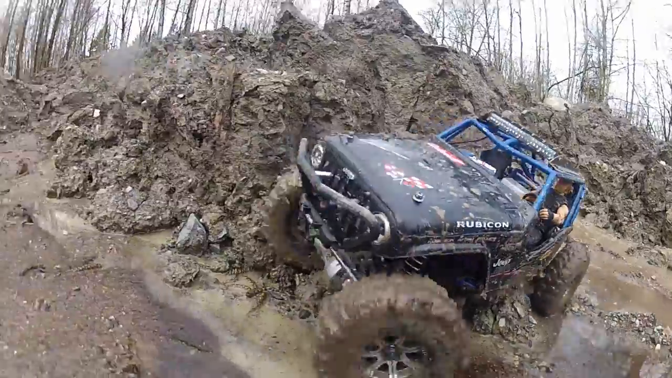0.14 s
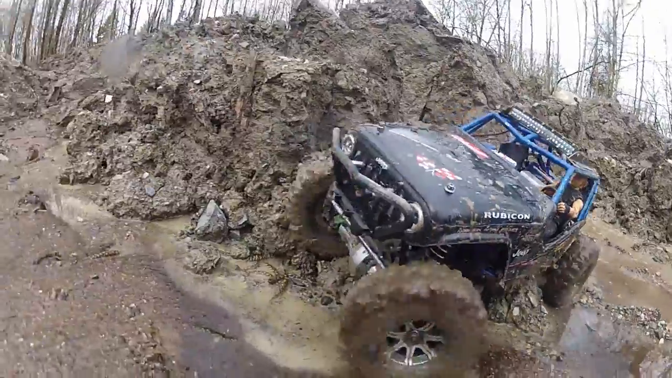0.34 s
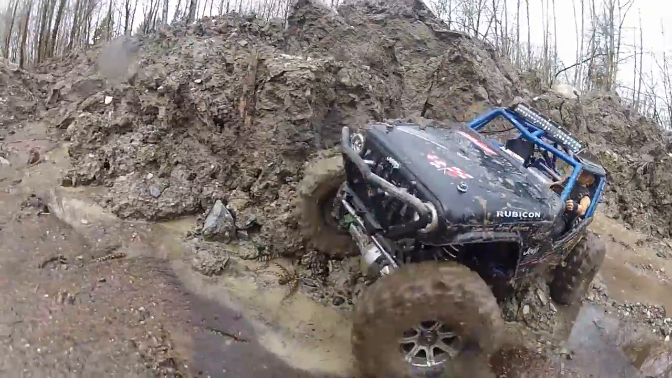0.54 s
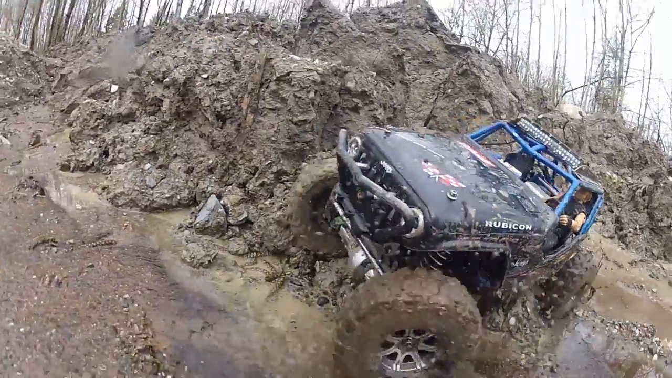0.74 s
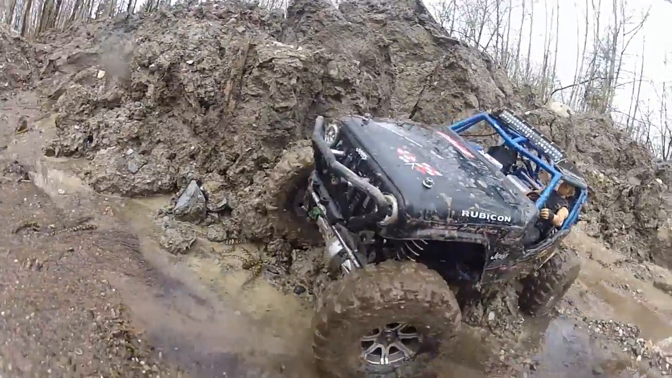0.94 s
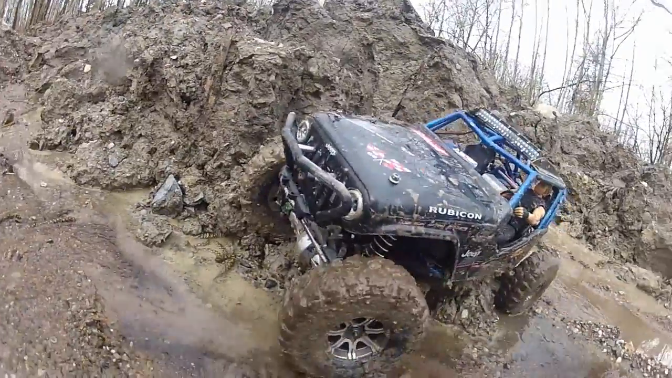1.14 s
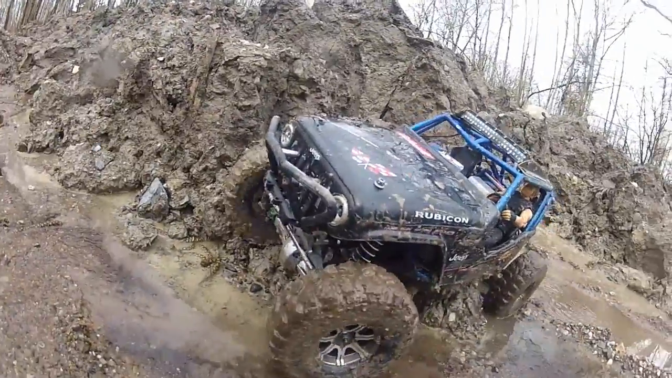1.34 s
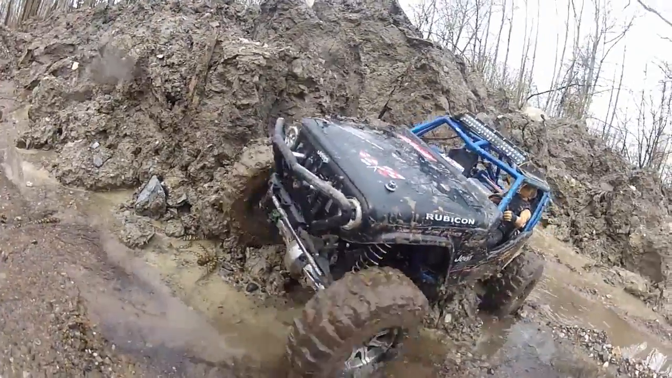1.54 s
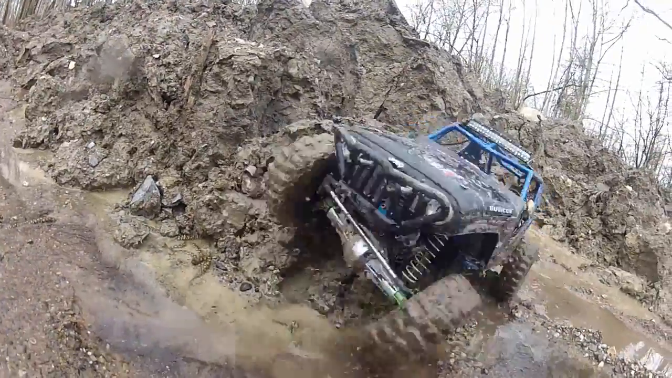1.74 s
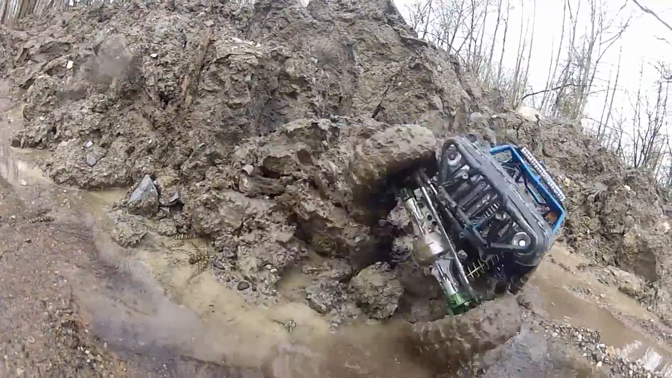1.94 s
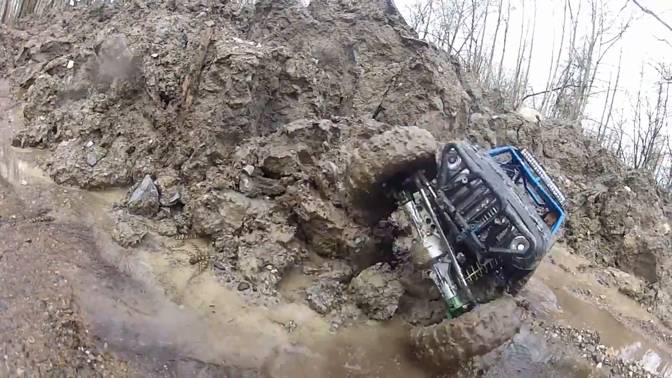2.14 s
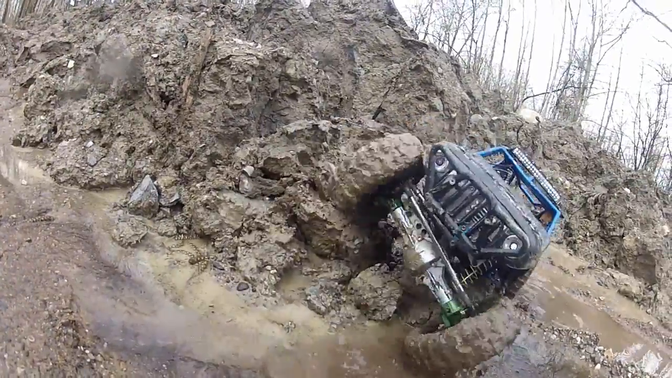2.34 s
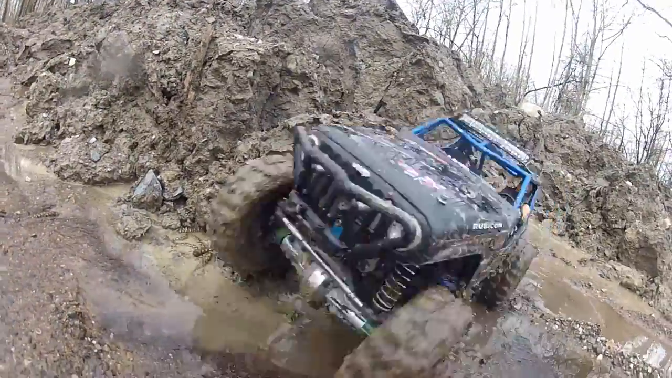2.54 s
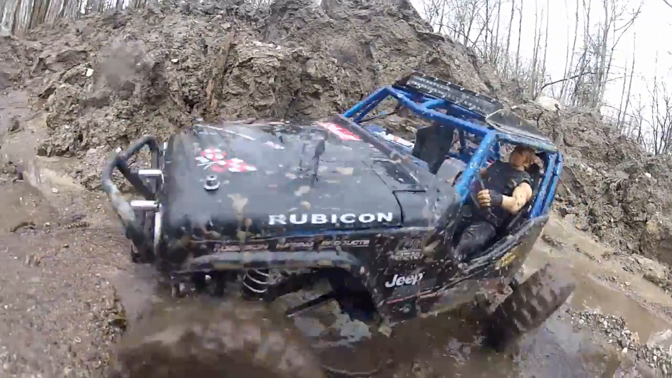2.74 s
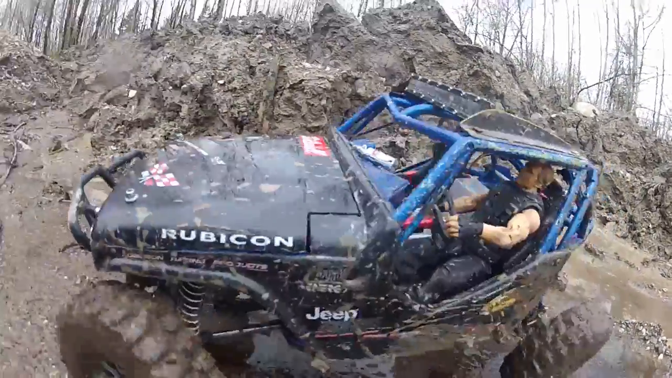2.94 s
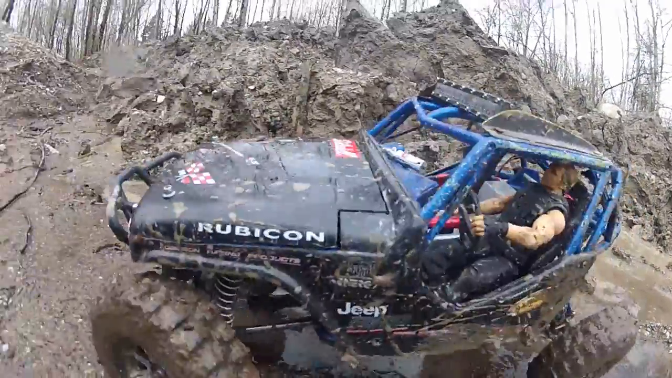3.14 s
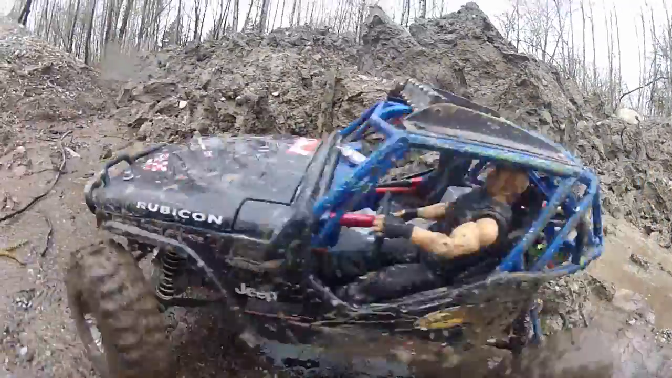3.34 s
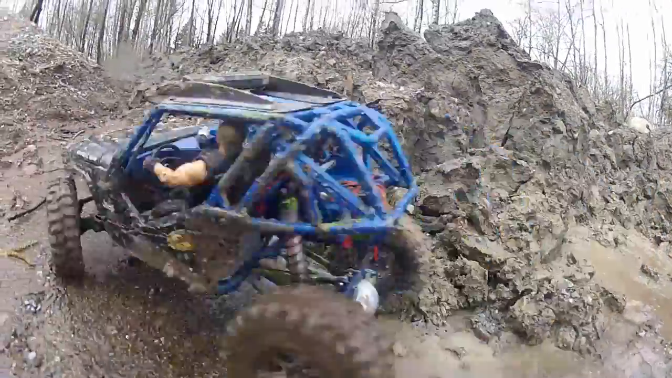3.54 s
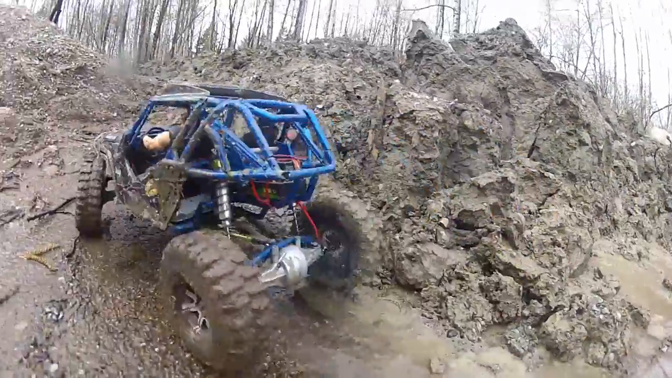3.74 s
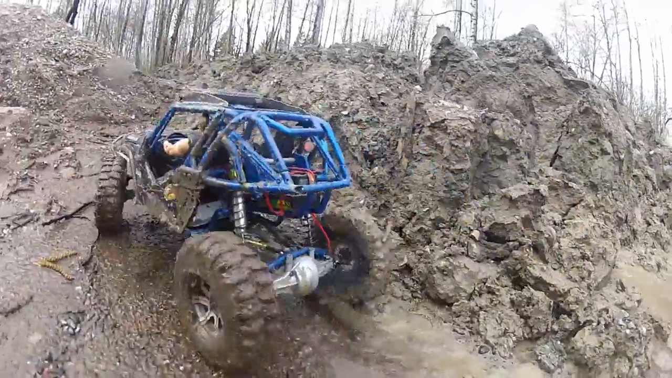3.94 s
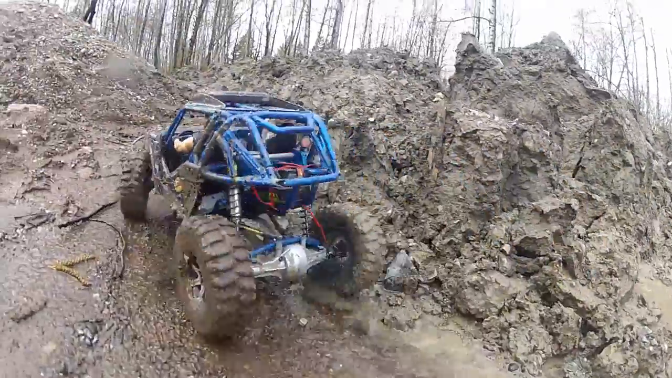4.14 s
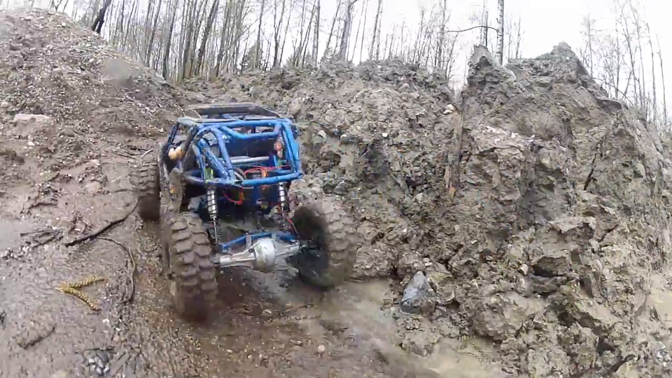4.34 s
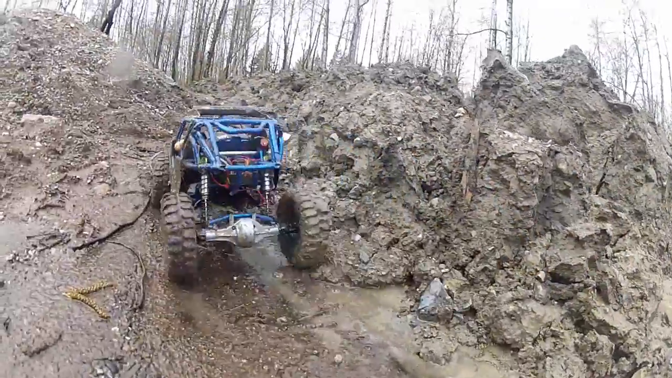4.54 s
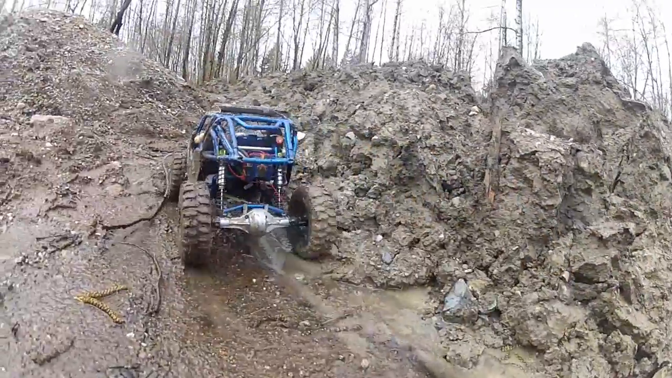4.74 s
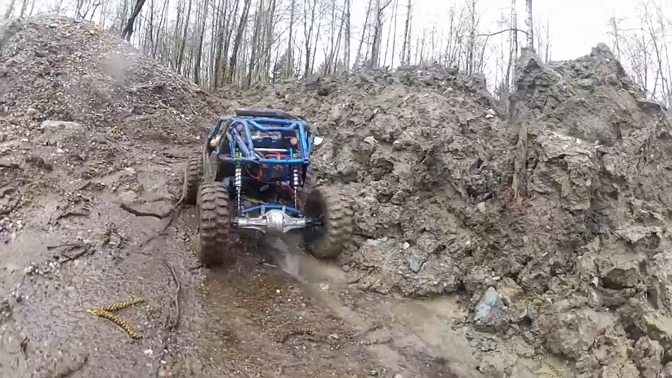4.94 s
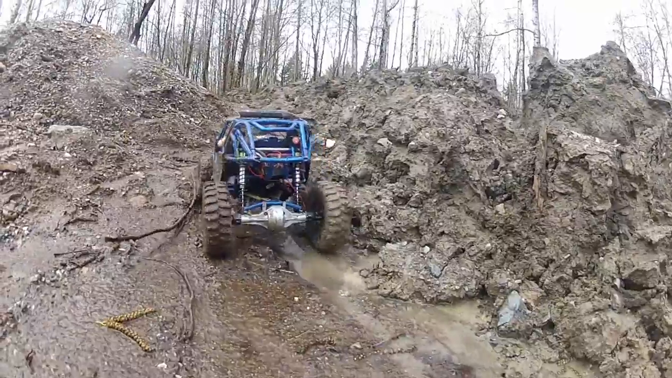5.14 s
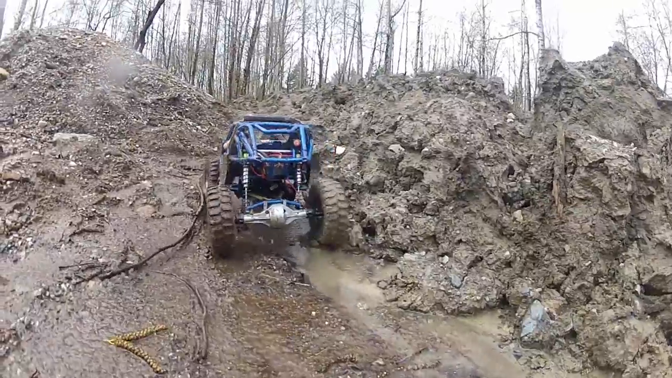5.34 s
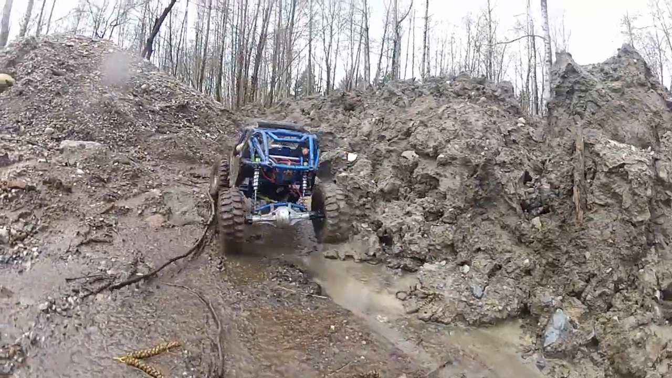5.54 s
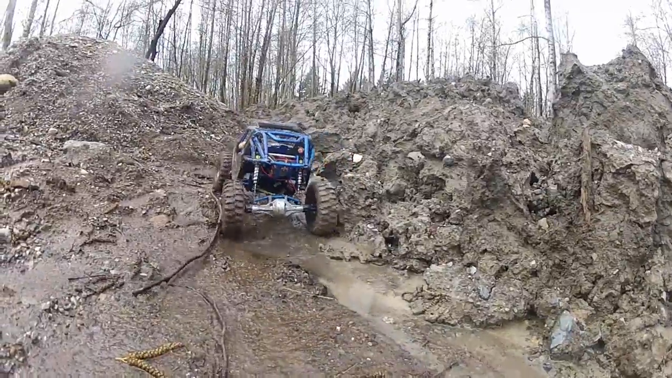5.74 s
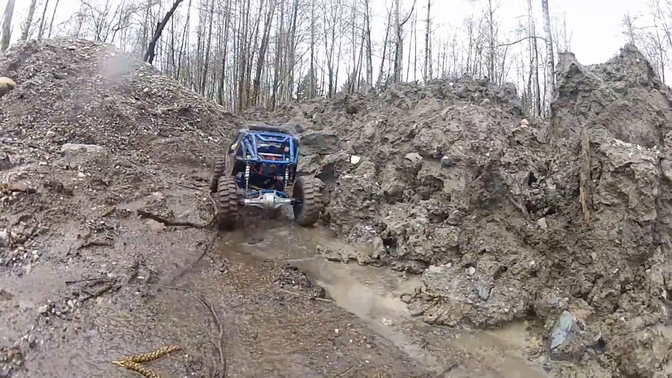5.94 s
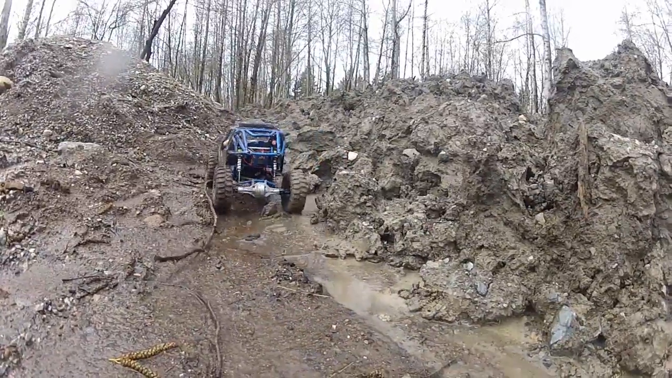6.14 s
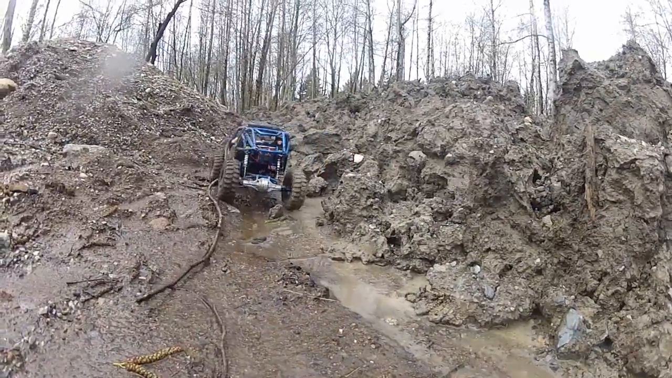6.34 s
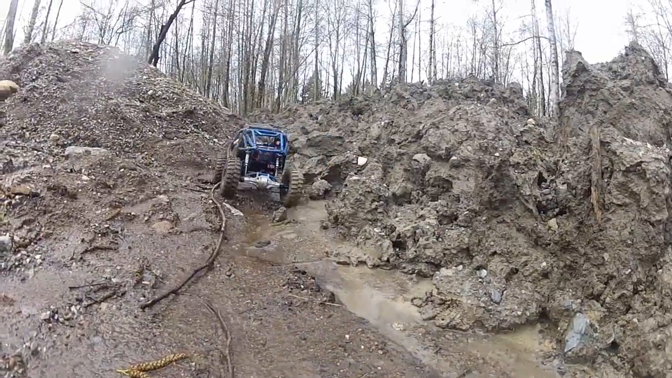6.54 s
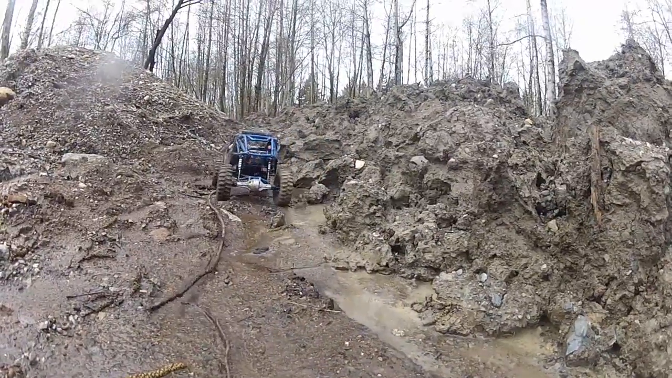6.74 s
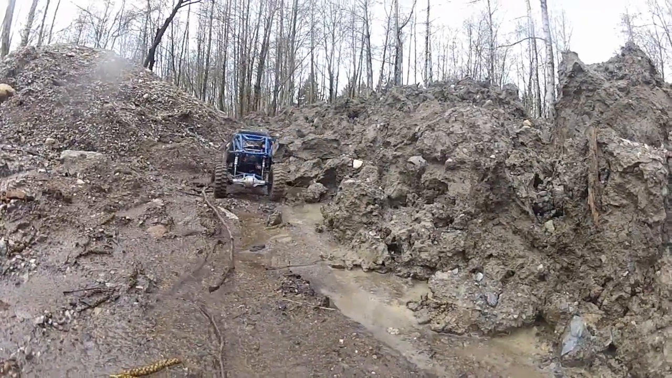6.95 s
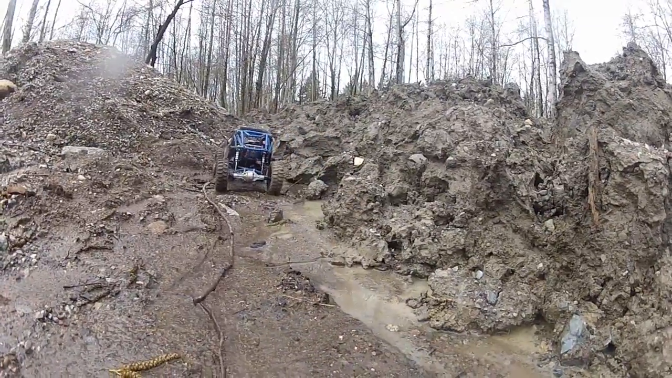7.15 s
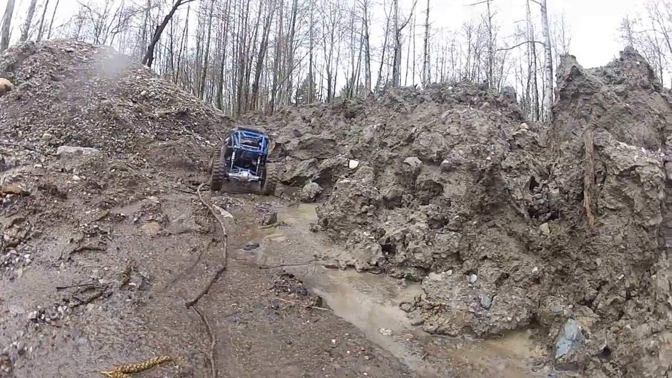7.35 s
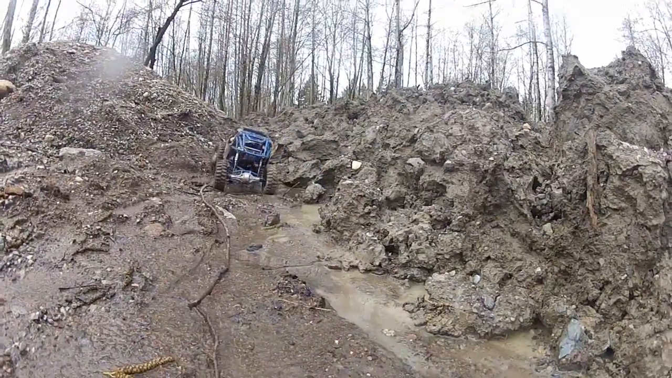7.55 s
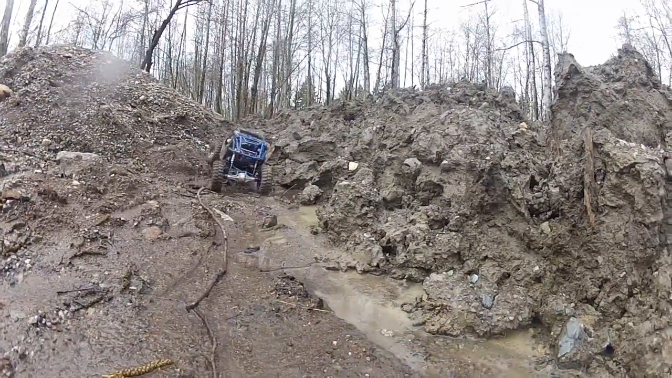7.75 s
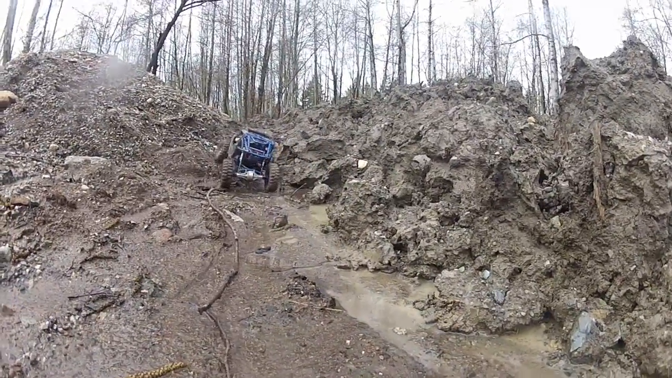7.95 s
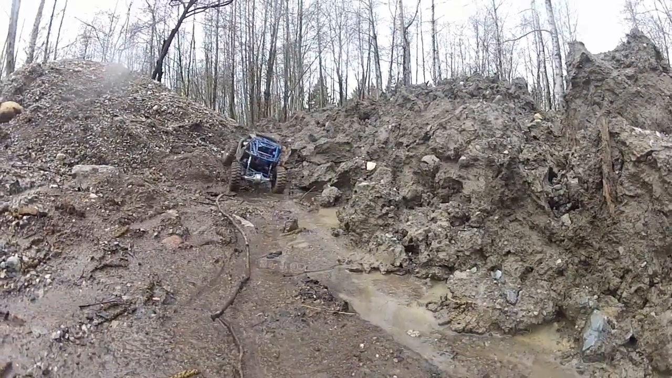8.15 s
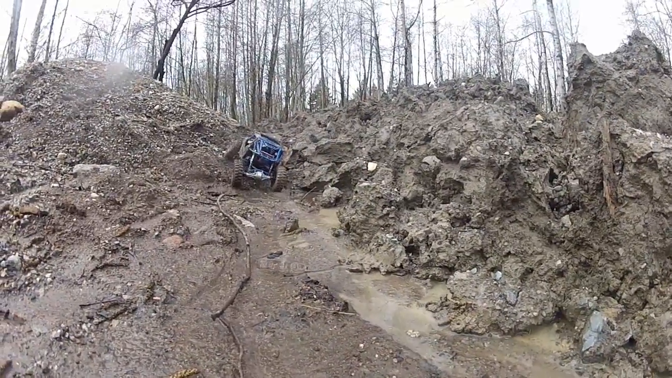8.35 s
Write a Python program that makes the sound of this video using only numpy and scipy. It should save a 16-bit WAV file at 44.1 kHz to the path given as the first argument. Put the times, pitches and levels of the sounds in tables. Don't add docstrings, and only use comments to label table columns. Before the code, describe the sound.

Small electric model truck rattles and whines through mud beside the microphone, knocks hard once, falls quiet, surges twice, then grinds away under wind rumble.

```python
import sys
import numpy as np
from scipy import signal
from scipy.fft import rfft, irfft
from scipy.io import wavfile
from scipy.ndimage import uniform_filter1d

SR = 44100
rng = np.random.default_rng(int(sys.argv[2]) if len(sys.argv) > 2 else 0)


def unload_wav(signal):
    wavfile.write(
        sys.argv[1],
        SR,
        np.round(np.clip(np.atleast_2d(signal).T, -1, 1) * 32767).astype(np.int16),
    )


def natural_amplitude(level_db):
    exponent = np.asarray(level_db, float) / 20
    return 10 ** exponent


N = 373968
TIME = np.arange(N) / SR

# start [s], crest [s], end [s], crest level [dB], end level [dB].
BURSTS = [(0.0, 0.033, 0.65, -57, -54), (0.55, 0.56, 0.58, -43, -39.5), (0.595, 0.734, 0.89, -42.5, -44.5),
          (1.325, 1.683, 1.97, -58, -59.5), (2.395, 2.712, 2.93, -46.5, -55),
          (2.927, 2.934, 3.08, -61, -64.5), (3.13, 3.206, 3.36, -73, -68), (3.27, 3.473, 3.68, -49, -50),
          (3.65, 3.704, 3.94, -57, -57.5), (3.94, 4.073, 4.665, -53.5, -56),
          (4.68, 4.86, 5.55, -58.5, -56.5), (5.5, 5.58, 6.2, -57.5, -57.5), (6.15, 6.2, 6.9, -59, -57),
          (6.896, 6.947, 9.35, -58, -62)]
# time [s], share [0-1].
TURN = [(0.0, 0.47), (.55, 0.35), (.68, 0.29), (2.9, 0.01), (3.05, 0.55), (3.3, 0), (3.66, 0), (3.9, 0.78),
        (4.75, 1.02), (5.5, 1.19), (8.48, 0.94)]
# frequency [Hz], width [Hz], level [dB].
CHASSIS_MODES = [(1127, 78, -6.5), (1316, 87, -1.5), (1500, 47, -0.5), (1690, 63, -2.5), (1921, 110, 1)]
GEARBOX_MODES = [(2247, 147, -7), (2405, 400, -12.5)]
CAN_MODES = [(2898, 128, 5.5), (3286, 100, -14), (3665, 280, -0.5)]
SHELL_MODES = [(591, 190, 2.5), (790, 145, 0)]
# time [s], mesh frequency [Hz], load [dB].
SURGES = [
    [(.465, 1044, -3), (.485, 1168, 3), (.505, 1100., -3), (.525, 1130., -8), (.556, 1470., 1),
     (.6, 1455, -2.5), (.636, 1690., 8)],
    [(2.42, 1376, -2), (2.45, 1400., 0.5), (2.475, 1047, -6), (2.53, 1339, -1), (2.57, 1160., -3),
     (2.6, 1489, 1), (2.62, 1642, -2), (2.642, 1470, 5), (2.662, 1472, -1)],
    [(2.666, 2285, 1), (2.688, 2336, 1), (2.7, 1950., -6), (2.714, 1937, 7), (2.73, 2244, -8),
     (2.742, 2250., 0), (2.752, 1900., 1), (2.768, 1750., -1), (2.8, 1855, -8)],
    [(2.802, 1484, 2), (2.811, 1358, 9.5), (2.825, 1160., 6.5), (2.84, 1224, -4), (2.852, 1330., 6.5),
     (2.866, 1497, -3), (2.878, 1452, -4), (2.892, 1180., -2), (2.93, 1048, -12)],
    [(3.39, 990., -10), (3.415, 1230., -3), (3.44, 1560., -4), (3.455, 1550., -5), (3.468, 1486, 2),
     (3.49, 1330., -3), (3.505, 1603, 1), (3.52, 2202, 1)],
    [(3.52, 2197, 5), (3.536, 1860., 5.5), (3.556, 1850., -5), (3.57, 2317, 1), (3.587, 2200., -3),
     (3.598, 1900., 6), (3.624, 1900., -3.5), (3.635, 1878, 5), (3.652, 1873, 1)],
    [(3.652, 1790, -3), (3.67, 1398, -4), (3.7, 1053, -1)],
    [(3.738, 1102, 0), (3.755, 1280., 3.5), (3.787, 1080., 1.5)],
]
# time [s], mesh frequency [Hz], load [dB].
CRAWL_NEAR = [
    [(0.0, 855, 6), (.055, 874, 2), (.1, 638, 4), (.16, 667, 3), (.2, 779, 1.5), (.29, 738, -1),
     (.335, 860, -6), (.41, 764, -2), (.45, 800., 5)],
    [(3.8, 744, 10.5), (3.9, 742, -11), (3.97, 680., 5.5), (4.04, 730., 0), (4.13, 703, -3), (4.15, 747, 7),
     (4.23, 740., -3)],
    [(4.23, 749, -1), (4.27, 901, 0), (4.31, 1006, 4.5), (4.38, 740., -1), (4.45, 943, 6.5),
     (4.49, 818, 2.5), (4.555, 1004, 1), (4.62, 875, 2.5), (4.68, 750., -6)],
    [(4.83, 536, 6), (4.892, 669, 4), (4.99, 640., -8), (5.14, 505, 3), (5.2, 570., 10), (5.27, 563, 2),
     (5.33, 509, 7), (5.37, 562, -2), (5.434, 564, -4)],
]
# time [s], mesh frequency [Hz], load [dB].
CRAWL_FAR = [
    [(5.434, 564, 0), (5.5, 648, -8), (5.54, 639, 7), (5.58, 790., 1), (5.674, 786, 4.5), (5.732, 965, 1.5),
     (5.8, 654., -1)],
    [(5.8, 653, 2), (5.888, 835., 2), (5.946, 775, -1.5), (6.028, 1005, 1.5), (6.078, 780., -13),
     (6.11, 739, -5), (6.17, 988, 2), (6.256, 743.8, -8)],
    [(6.256, 740., 1), (6.3, 790., -3), (6.37, 651, 5), (6.47, 768, 1.5), (6.53, 650, 6),
     (6.62, 800., -1.5), (6.68, 649, 3), (6.77, 749, 0), (6.83, 656, 7)],
    [(6.9, 660, 10), (7.15, 647, 5), (7.28, 640, -13), (7.37, 751, 0), (7.54, 762, -6), (7.6, 600, 8),
     (7.66, 748, -2), (7.75, 770, -4)],
    [(7.75, 771, 2), (7.85, 637, 5), (7.92, 570., 3), (8.0, 650, 8.5), (8.06, 750., 4), (8.16, 742, 3),
     (8.25, 650, 9), (8.33, 580., 7), (8.48, 670, 5.5)],
]
CRAWLS = CRAWL_NEAR + CRAWL_FAR
# level [dB] of one surge, then of one crawl.
WHINE_DB = [-47, -44.5, -41, -43, -41, -41, -44.5, -46.5, -45.5, -49.5, -48.5, -56, -51, -51, -52.5, -56.5,
            -61.5]
# frequency [Hz], width [Hz], level [dB].
SINGING_MODES = [(800, 89, -3), (1002, 50, 4.5), (1130, 120, -0.5), (1308, 83, 1.5), (1496, 66, 2.5),
                 (1770, 194, 3.5), (1924, 155, 4), (2337, 88, 1), (2920, 320, 3), (3720, 340, 1)]
# frequency [Hz], density [dB per Hz].
AIR_SPECTRUM = [(12, -44), (20, -5), (60, -1.5), (114, -10.5), (148, -11), (331, -10.5), (356, -12),
                (546, -19), (1060, -23.5), (2020, -24.5), (2890, -27), (5490, -29.5), (5900, -25.5),
                (7670, -64), (13000, -120)]
# time [s], level [dB].
GUSTS = [(0.0, -55), (0.28, -55.5), (0.71, -54), (0.9, -63), (2.1, -67.5), (2.5, -70), (2.9, -61),
         (3.3, -61), (4.94, -67.5), (5.6, -63.5), (6.1, -65), (6.75, -58.5), (6.9, -61), (7.2, -70.5),
         (7.93, -61), (8.2, -66), (8.48, -70)]
# time [s], peak level [dB], frequency [Hz].
THUMPS = [(0.092, -38, 82), (.12, -42, 60.5), (0.15, -39, 63), (0.211, -36, 97), (0.27, -40.5, 108),
          (.33, -50, 69.8), (.39, -55.5, 70), (0.5, -34.5, 109), (0.598, -34, 67.1), (0.656, -38, 168),
          (0.71, -34.5, 118), (0.821, -37.5, 79), (2.615, -42.5, 124), (2.714, -42, 122),
          (2.891, -40.5, 119), (3.03, -48, 70), (3.173, -42.5, 86), (3.716, -46, 115), (4.07, -48, 88.64),
          (5.465, -47, 49.98), (5.83, -44.5, 78.2), (6.23, -45, 55.24), (6.256, -39, 240), (6.263, -42, 60),
          (6.317, -38.5, 71.5), (6.395, -47, 69.93), (6.41, -49, 39.9), (6.524, -46, 111.8),
          (6.545, -40, 95), (6.565, -49, 50.4), (6.602, -47, 121), (6.669, -45, 99.2), (6.699, -42, 103.7),
          (6.753, -40.5, 83.5), (6.775, -48, 49.7), (6.808, -32, 97), (6.875, -40, 40.17), (6.907, -41, 72),
          (6.925, -49, 39.95), (7.368, -44, 117.5), (7.755, -40, 84.1), (8.035, -38, 119.3)]
# time [s], crack peak [dB], boom relative to it [dB], boom frequency [Hz],
# wall ring relative to it [dB].
KNOCKS = [
    (.5712, -8.5, -3, 173, -14),
    (6.8527, -20, -8, 241, 6),
    (6.7695, -45.5, -15, 241, 6.5),
    (6.8215, -41, -15, 241, 6.5),
]
# frequency [Hz], level [dB], 60 dB decay time [s].
LID_MODES = [(1300, -6.5, 0.018), (1627, 5.5, 0.01), (2820, 4.5, 0.0068), (3560, 5, 0.0076),
             (5400, -6, 0.0092)]
# time [s], peak level [dB].
SLAMS = [(0.6404, -29), (0.6629, -31), (0.6848, -32), (0.7118, -32), (0.7507, -38), (0.7851, -31),
         (0.82, -36), (0.854, -47), (0.8709, -28), (2.4039, -58), (2.4608, -42), (2.4882, -48),
         (2.5012, -41), (2.5257, -42), (2.5351, -41), (2.5544, -41), (2.5716, -36.5), (2.6595, -23.5),
         (2.6874, -26), (2.7212, -28), (2.7402, -26.5), (2.7751, -38), (2.8978, -56), (3.5678, -29),
         (3.5788, -28.5), (2.671, -23), (3.48, -40)]
# time [s],
# peak level [dB], frequency [Hz].
CAN_RINGS = [(.6273, -41, 2880), (.6757, -40, 2940), (.6971, -37, 3020), (.73, -39, 2800), (.7367, -34, 3700),
             (.748, -35, 3650), (.7689, -31.5, 3660), (.779, -33, 3620), (.786, -35, 2950), (.798, -30, 3030),
             (.8138, -31, 3680), (.8145, -37, 2800), (.824, -33, 3600), (.8353, -29, 3610), (.846, -37, 3480),
             (2.581, -46, 3750), (2.617, -46, 3300), (2.712, -41, 3900), (2.762, -47, 3520), (2.9, -44, 3050),
             (3.3043, -47, 3040), (3.3582, -45, 2930), (3.3871, -48, 2935), (3.4141, -39.5, 3700),
             (3.437, -41, 2940), (3.5049, -41, 3740), (3.5318, -36.5, 3740), (3.55, -37, 3697),
             (3.5962, -32.5, 3735), (3.607, -38, 3734), (3.6326, -34, 3784), (3.6431, -35, 3720),
             (3.66, -46, 3050), (3.7478, -42.5, 3800), (3.787, -45.5, 3710)]
# first tick [s], last tick [s], gap [s], peak level [dB].
COGGING_RUNS = [(.9565, .9566, .03, -50), (1.0465, 1.2356, .063, -56), (1.0779, 1.2051, .0636, -64),
                (1.3039, 1.3269, .023, -62), (1.3838, 1.508, .0414, -54.5), (1.5244, 1.6147, .0226, -51),
                (2.339, 2.371, .032, -59.5), (3.1378, 3.1692, .0314, -52.5), (3.2176, 3.2525, .035, -52.5)]
# time [s], peak level [dB].
PICKUP = [(1.3353, -62), (1.3498, -61), (1.3713, -64), (1.4665, -53), (1.6282, -45), (1.6676, -42),
          (1.6916, -46), (1.7104, -43), (1.7365, -46), (1.7579, -43.5), (1.7898, -47), (1.8123, -45),
          (1.8392, -47), (1.8607, -44), (1.8794, -49), (1.8971, -46), (1.9144, -60), (1.9355, -44.5),
          (1.9514, -51), (1.9659, -48), (1.9844, -50), (2.0033, -53), (2.0522, -63)]
# first tick [s], last tick [s], mean gap [s], peak level [dB],
# bend [exponent; under 1 quickens].
SERVO_RUNS = [(1.2791, 1.5764, .037, -61, 0.65), (2.7822, 2.7823, .03, -41, 0.99),
              (2.9697, 3.1129, 0.036, -56.5, 0.81), (3.201, 3.283, .041, -54.5, 0.76),
              (3.8896, 3.9425, .0265, -55, 1.01), (4.7083, 4.818, .055, -59.5, 1.54)]
# start [s], length [s], peak level [dB], bright part relative to dull [dB].
SPATTER = [(6.763, 0.028, -50.5, -11), (6.82, 0.031, -51, -5), (6.844, 0.053, -35.5, -2),
           (7.992, 0.11, -60.5, -2.5), (8.093, 0.11, -61.5, -1)]
# frequency [Hz], gain [dB].
WEAK_BANDS = [(4300, 0.5), (4550, -5), (4750, -1), (5850, 1.5), (6050, -6), (6250, 1.5), (7300, -1),
              (7520, -5), (7750, 0.5), (10900, 0), (11300, 0.5), (12900, -5.5), (13300, 0.5), (14550, -3),
              (14750, -76)]


def curve(tables, column, off=-120.):
    out = np.full(N, off)
    for table in tables:
        rows = np.array(table)
        inside = (TIME >= rows[0, 0]) & (TIME <= rows[-1, 0])
        out[inside] = np.interp(TIME[inside], rows[:, 0], rows[:, column])
    return out


def unit(x):
    return x / np.sqrt(np.mean(x ** 2))


def band(x, lo_hz, hi_hz):
    return signal.sosfilt(signal.butter(3, [lo_hz, hi_hz], "band", fs=SR, output="sos"), x)


def ring(x, hz, width_hz):
    return signal.lfilter(*signal.iirpeak(hz, hz / width_hz, fs=SR), x)


def walk(rate):
    k = int(SR / rate)
    steps = np.repeat(rng.standard_normal(N // k + 1), k)
    return 1.356 * uniform_filter1d(uniform_filter1d(steps, k), k)[:N]


def grains(rate, spread_db):
    hit = rng.random(N) < rate / SR
    sign = rng.choice([-1, 1], N)
    size_db = spread_db * np.minimum(rng.exponential(size=N), 3.5)
    return unit(hit * sign * natural_amplitude(size_db))


def waver(x, depth_s, rate):
    return np.interp(TIME + depth_s * walk(rate), TIME, x)


def place(events, shape):
    out, span = np.zeros(N), np.arange(-5000, 5000)
    for s, db, *rest in events:
        where = int(s * SR) + span
        where = where[(where >= 0) & (where < N)]
        wave = shape(where / SR - s, *rest)
        out[where] += natural_amplitude(db) * wave / np.abs(wave).max()
    return out


def struck(t, hz, t60, rise=0.00072):
    t = np.maximum(t, 0)
    return np.sin(2 * np.pi * hz * t) * (1 - np.exp(-t / rise)) * np.exp(-np.log(1000) * t / t60)


def throttle():
    rise_db_per_s, grab_s, release_s, rest_db = 42, 0.012, 0.096, -90
    levels = []
    for start, crest, end, crest_db, end_db in BURSTS:
        times = [start - grab_s, start, crest, end, end + release_s]
        start_db = crest_db - rise_db_per_s * (crest - start)
        levels.append(np.interp(TIME, times, [rest_db, start_db, crest_db, end_db, rest_db]))
    return np.max(levels, axis=0)


def body(modes, rate, spread_db, flicker_db, swell_db):
    shared, out = grains(rate, spread_db), 0
    for hz, width, db in modes:
        impacts = .5 * shared + grains(rate, spread_db)
        tone = ring(ring(impacts, hz, width), hz, 3 * width)
        level_db = db + flicker_db * walk(45) + swell_db * walk(7)
        out = out + natural_amplitude(level_db) * unit(waver(tone, 1.6 / hz, 14))
    return unit(out)


def drive_train():
    level_db, turn = uniform_filter1d(throttle(), size=800), curve([TURN], 1)
    pace_hz = uniform_filter1d(curve(CRAWLS, 1, off=840.0), size=500)
    load_db = uniform_filter1d(curve(CRAWLS, 2, off=0.), size=500)
    level_db = level_db + 7 * np.log2(pace_hz / 800) + 0.24 * load_db
    far = np.interp(TIME, [6.24, 6.64], [0, 1])
    box_db, can_db = 3.0 - 15 * turn, 2.5 - 8 * turn - 9 * far
    shell_db = -7 - 0.32 * (level_db + 59) - 10 * np.clip(turn - .4, 0, 1) / 0.5
    chassis = body(CHASSIS_MODES, 900, 2.5, 2.6, .7)
    chassis = chassis + natural_amplitude(-7) * unit(band(grains(3000, 2.0), 950, 2700))
    box = body(GEARBOX_MODES, 500, 1.8, 3.7, 1.0)
    can = body(CAN_MODES, 900, 2.2, 2.0, .6)
    can = can + natural_amplitude(-7.5) * unit(band(grains(3000, 1.1), 2330, 3930))
    shell = body(SHELL_MODES, 600, 1.6, 2.9, 0.43)
    shell = shell + natural_amplitude(-5.0) * unit(band(rng.standard_normal(N), 343, 940))
    grit = natural_amplitude(-8.5 + 0.5 * can_db + 1.0 * walk(25)) * unit(band(grains(5000, 0.98), 4390, 6200))
    grit = grit + natural_amplitude(-16) * turn * unit(ring(rng.standard_normal(N), 5900, 150))
    parts = natural_amplitude(-3.5) * chassis + natural_amplitude(box_db - 0.4) * box + natural_amplitude(can_db - 1.8) * can
    parts = parts + natural_amplitude(shell_db - 2.5) * shell + grit
    return natural_amplitude(level_db + 0.69 * walk(14)) * parts


def mesh():
    tables = SURGES + CRAWLS
    hz = curve(tables, 1, off=1500.)
    fade_s, fade_db = .012, -7
    strength = []
    for rows, db in zip(tables, WHINE_DB):
        first, last = rows[0][0], rows[-1][0]
        strength.append([(first, db + fade_db), (first + fade_s, db),
                         (last - fade_s / 2, db), (last, db + fade_db)])
    on = uniform_filter1d(natural_amplitude(curve(strength, 1) + curve(tables, 2, off=0.)), size=300)
    phase = 2 * np.pi * np.cumsum(hz * (1 + .028 * walk(120) + .012 * walk(18))) / SR
    beat = natural_amplitude(2.2 * walk(90)) * (1 + .5 * np.cos(phase / 9 + 2 * walk(30)))
    overtones = natural_amplitude(-0.5) * np.sin(2 * phase) + natural_amplitude(-2) * np.sin(3 * phase) + natural_amplitude(-7) * np.sin(4 * phase)
    overtone_db = -8 * np.log2(hz / 800) + 1.56 * walk(66)
    tone = beat * np.sin(phase) + natural_amplitude(overtone_db) * overtones
    tone = on * tone * natural_amplitude(13 * np.log2(np.minimum(hz / 1500, 1)) + 0.92 * walk(28))
    out = natural_amplitude(-10) * band(tone, 723, 3350)
    for k, (mode_hz, width, db) in enumerate(SINGING_MODES):
        out = out + (-1) ** k * natural_amplitude(db) * ring(tone, mode_hz, width)
    return out


def air():
    hz = np.maximum(np.fft.rfftfreq(N, 1 / SR), 1)
    corner_hz, density_db = np.transpose(AIR_SPECTRUM)
    shape_db = np.interp(np.log(hz), np.log(corner_hz), density_db, right=-90)
    hiss = unit(irfft(rfft(rng.standard_normal(N)) * natural_amplitude(shape_db), N)) * natural_amplitude(-61.5 + 0.39 * walk(3.18))
    rumble = unit(band(grains(120, 2.7) + 0.36 * rng.standard_normal(N), 30, 238))
    return hiss + natural_amplitude(curve([GUSTS], 1) - 2.0 + 2.7 * walk(11)) * rumble


def thumps():
    def shape(t, hz):
        dip = -np.cos(2 * np.pi * hz * t + 0.28) * np.exp(-(t * hz / 0.27) ** 2)
        return dip + 0.48 * struck(t - 0.16 / hz, 0.69 * hz, 5.0 / hz, rise=.002)
    return place(THUMPS, shape)


def knocks():
    def shape(t, boom_db, hz, wall_db):
        crack = -np.exp(-((t - .0009) / .0001) ** 2)
        lid = sum(natural_amplitude(db) * struck(t, f, t60, rise=0.00064) for f, db, t60 in LID_MODES)
        wall = struck(t, 1366, 0.011, rise=0.00073) + 0.57 * struck(t, 1150, 0.016, rise=.001)
        wall = wall + 0.47 * struck(t, 2317.5, 0.023, rise=.001)
        boom = struck(t + 0.00018, hz, 0.057, rise=0.00076)
        return crack + natural_amplitude(wall_db) * wall - lid - natural_amplitude(boom_db) * boom
    return place(KNOCKS, shape)


def runs(table, scatter_db, jitter):
    out = []
    for first, last, gap, db, *bend in table:
        count = int(round((last - first) / gap)) + 1
        u = np.linspace(0, 1, count) ** (bend or [1])[0]
        luck = rng.standard_normal((16, 3))[:len(u)]
        times = first + (last - first) * u + jitter * gap * luck[:, 0] * np.sin(np.pi * u)
        out += zip(times, db + scatter_db * luck[:, 1], luck[:, 2])
    return out


def ticks():
    def slam(t, hz):
        box = struck(t, hz, 0.04 * 2300 / hz, rise=0.0012) + 0.32 * struck(t, 1.045 * hz, 0.025, rise=0.002)
        return box + natural_amplitude(-24.5) * struck(t, 580, 0.063, rise=.003)

    def rattle(t, hz):
        return struck(t, hz, 0.032, rise=0.0015) + 0.46 * struck(t, 0.96 * hz, 0.024, rise=0.0015)

    def cog(t, bite):
        return struck(t, 2862, 0.024) + 0.37 * (1 + 0.32 * bite) * struck(t, 2243, 0.027)

    cogs = place(runs(COGGING_RUNS, 1.2, 0.0087) + [(s, db + 2.5, 3) for s, db in PICKUP], cog)
    chances = rng.standard_normal(len(SLAMS))
    skips = [(s, db, 2272 * (1 + 0.015 * chance)) for (s, db), chance in zip(SLAMS, chances)]
    slams = place(skips, slam)
    can_rings = place(CAN_RINGS, rattle)
    servo = place(runs(SERVO_RUNS, 1.0, .01), lambda t, _: struck(t, 5860, 0.042))
    return cogs + waver(slams + can_rings, .00003, 200) + natural_amplitude(1) * servo


def spatter():
    drops = grains(2800, 0.94)
    dull = unit(band(drops, 1130, 2530) + 2.0 * ring(drops, 2180, 140) + 2.0 * ring(drops, 1330, 150))
    bright = unit(band(drops, 4080, 4810) + 3.1 * ring(drops, 3430, 380))
    rows = []
    for start, length, db, bright_db in SPATTER:
        crest = start + 0.3 * length
        rows.append([(start, db - 7.5, bright_db), (crest, db, bright_db), (start + length, db - 15, bright_db)])
    return natural_amplitude(curve(rows, 1)) * (dull + natural_amplitude(curve(rows, 2)) * bright)


def scene():
    mono = drive_train() + mesh() + ticks() + thumps() + knocks() + spatter() + air()
    return np.array([mono, mono])


def starve(x):
    mask_db = -9.5
    hz, _, cells = signal.stft(x, SR, window="cosine", nperseg=2048)
    power = uniform_filter1d(np.abs(cells) ** 2, size=2, axis=1) + 1e-20
    narrow = uniform_filter1d(power, size=6, axis=0)
    typical = np.exp(uniform_filter1d(np.log(narrow), size=60, axis=0))
    broad = uniform_filter1d(power, size=170, axis=0)
    masker = np.where(hz[:, None] < 10500, 1.05 * typical / natural_amplitude(mask_db), broad)
    cells[(narrow < masker * natural_amplitude(2 * mask_db)) & (hz[:, None] > 4200)] = 0
    return signal.istft(cells, SR, window="cosine", nperseg=2048)[1][:N]


def band_limit(x):
    return signal.sosfilt(signal.butter(12, 15640, fs=SR, output="sos"), x)


def record(dry):
    slow = signal.resample_poly(dry[0], 40, 147, window=("kaiser", 8.0))
    held = signal.resample_poly(np.repeat(slow, 4), 147, 160)[:N]
    hz, db = np.transpose(WEAK_BANDS)
    held = irfft(rfft(held) * natural_amplitude(np.interp(np.fft.rfftfreq(N, 1 / SR), hz, db)), N)
    held = starve(held)
    over_db = 10 * np.log10(uniform_filter1d(held ** 2, size=3000) + 1e-12) + 46
    apart = np.clip(over_db / 26.0, 0, 1)
    lean_db = -.45 * np.clip(over_db / 4, 0, 1)
    rough = band(walk(2500) * held, 250, 6500) + natural_amplitude(9.5) * band(walk(900) * held, 7000, 14600)
    grain = natural_amplitude(-19) * apart * rough
    return band_limit(np.array([held * natural_amplitude(2 * lean_db) + grain, held - grain]))


dry = scene()
out = record(dry)
unload_wav(out)
```